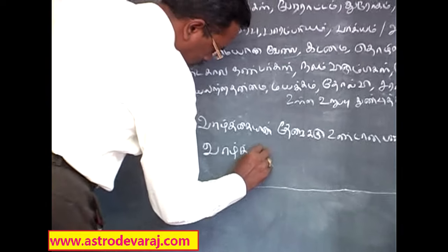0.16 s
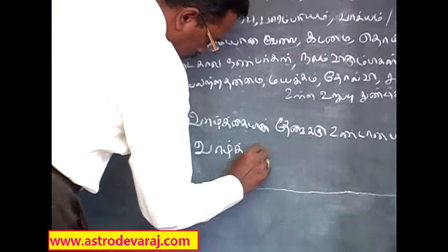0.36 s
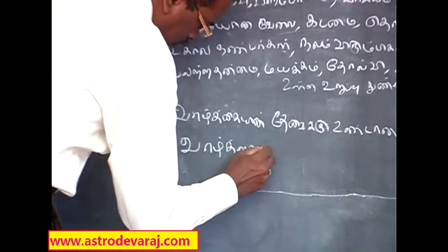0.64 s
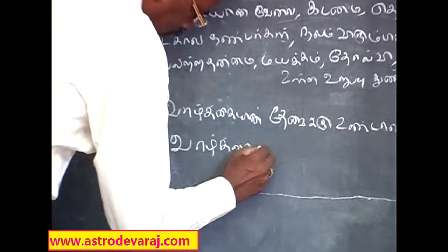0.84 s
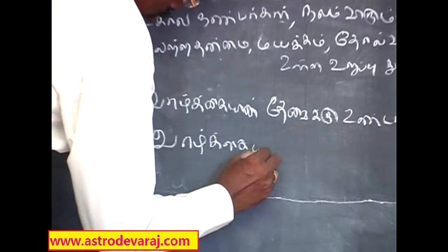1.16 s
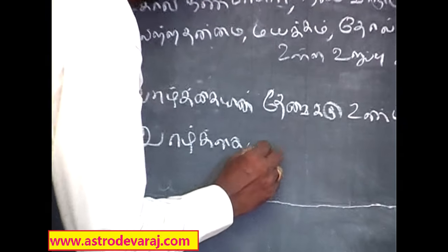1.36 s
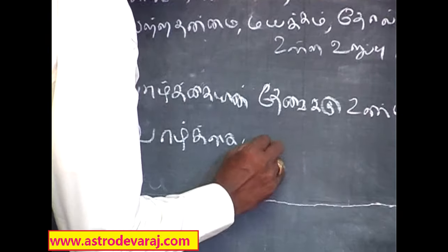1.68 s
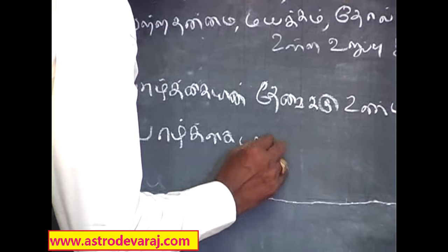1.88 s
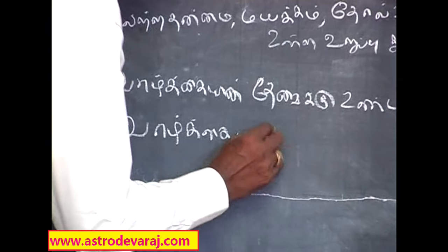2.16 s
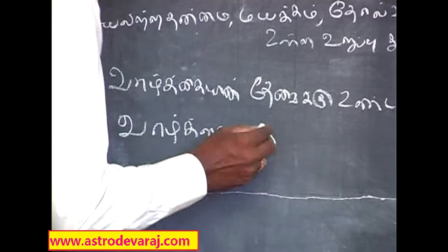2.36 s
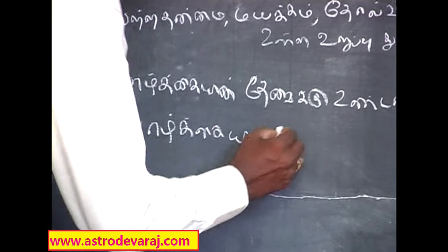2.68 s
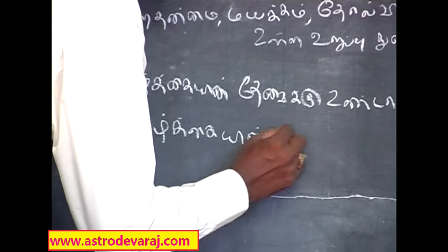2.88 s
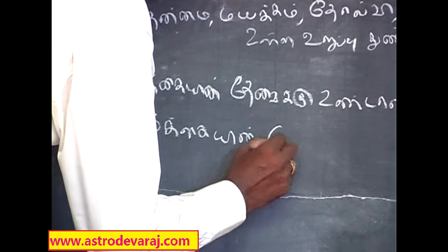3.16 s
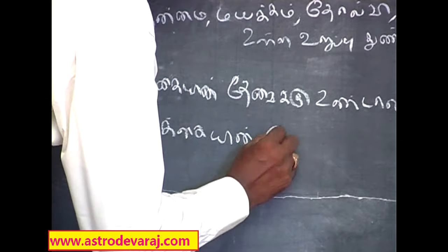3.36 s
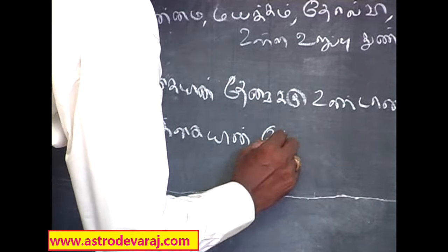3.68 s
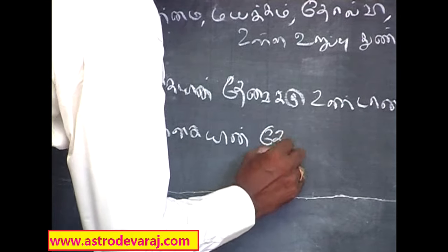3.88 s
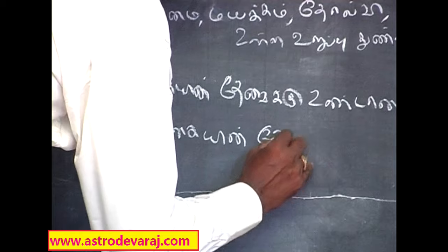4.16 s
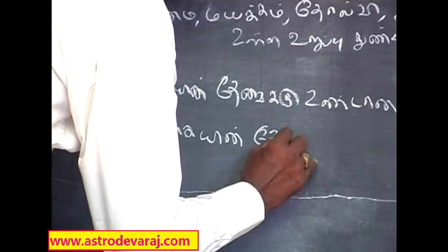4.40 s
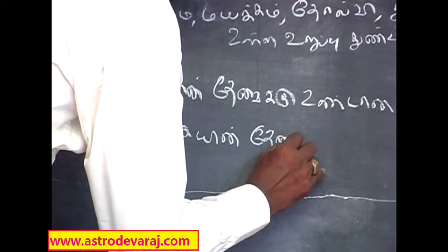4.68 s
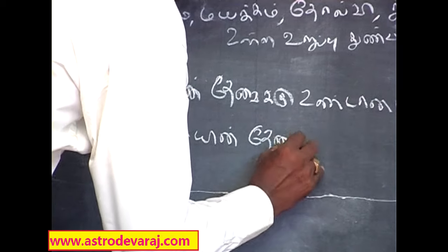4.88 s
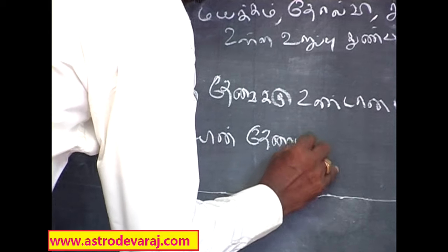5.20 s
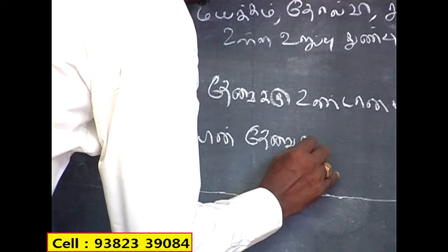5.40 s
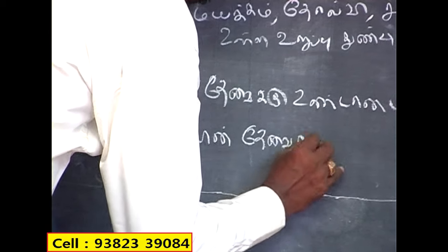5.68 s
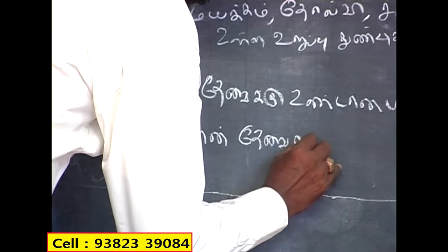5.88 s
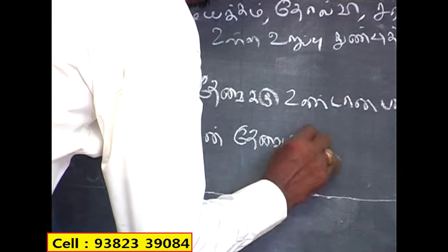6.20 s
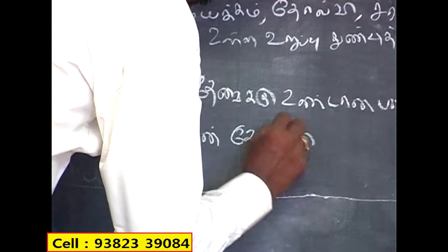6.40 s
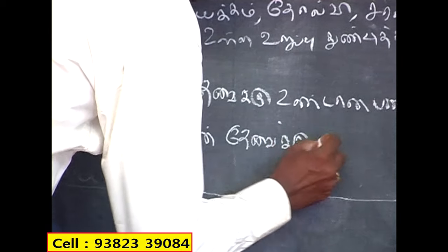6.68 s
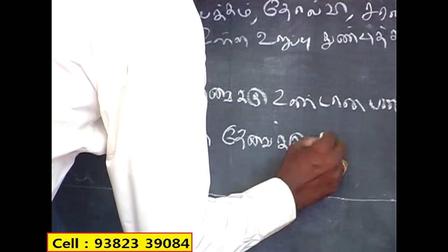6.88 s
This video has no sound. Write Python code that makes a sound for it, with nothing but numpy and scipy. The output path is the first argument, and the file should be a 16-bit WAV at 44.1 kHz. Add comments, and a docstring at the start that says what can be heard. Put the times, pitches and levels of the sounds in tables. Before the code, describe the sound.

Short, shrill chalk squeaks come in uneven runs on a nearby blackboard, mixed with dry scraping and light taps. After two brief groups of strokes, a click and a few soft knocks fill a pause of about a second. A longer run follows, finishing with a rasping squeak and a sharp tap. The classroom rings briefly after each stroke, over faint, low background noise.

```python
"""Chalk squeaking on a blackboard

Someone writes fast, close by, in a quiet classroom. The chalk taps down, then sticks and slips some
2500 times a second: each stroke is a short gliding squeak, a self-excited friction oscillation.
Crumbling chalk adds a dusty scrape, and its drag draws a soft thud from the panel. The room rings
briefly after each stroke, over low noise and a faint electrical whine."""
import sys
import numpy as np
from scipy import signal
from scipy.fft import rfft, irfft, next_fast_len
from scipy.io import wavfile
from scipy.ndimage import uniform_filter1d, minimum_filter1d

SR = 44100
rng = np.random.default_rng(int(sys.argv[2]) if len(sys.argv) > 2 else 0)


def persist_wave(psi):
    """Save psi, clipped to +-1, as 16-bit WAV."""
    counts = np.round(np.clip(psi, -1, 1) * 32767).astype(np.int16)
    wavfile.write(sys.argv[1], SR, np.atleast_2d(counts).T)


N = 310905
TIME = np.arange(N) / SR

# Chalk strokes: start t/s, rise to full grip t/s, length t/s, level/dB, fade by the end/dB,
# slip rate f/Hz on landing, at full grip and on lifting,
# relative level/dB of second harmonic, third harmonic, dust and thud
STROKES = [ (0.0, 0.0013, .024, -7.5, 12, 2532, 2548, 2642, 0.5, -9.5, 2, -8),
           (0.201, 0.011, .042, -12, 15.5, 2524, 2526, 2606, -3.5, -12.5, 2.5, 2.5),
           (0.376, 0.036, .062, -12.5, 17, 2813, 2522, 2560, 4.5, -7.5, -4, -4.5),
           (1.094, .021, .049, -14.5, 0.5, 2760, 2466, 2474, -1, -4, 0, 2.5),
           (1.294, .052, .104, -13.5, 4, 2597, 2341, 2344, -2.5, -14.5, 4, 1),
           (1.757, 0.03, .074, -13.5, -1, 2560, 2321, 2680, -1, -10.5, 0, 5),
           (1.975, 0.02, .07, -14.5, -1.5, 2557, 2318, 2763, 2, -9.5, -1, 2.5),
           (3.149, 0.02, .048, -17.5, 9, 2684, 2511, 2661, -6.5, -17, 1.5, 3.5),
           (3.378, 0.013, .029, -14, 6, 2641, 2609, 2757, -1, -15, 4, 2),
           (3.615, 0.01, 0.027, -20.5, 18.5, 2740, 2741, 2797, 1.5, -30.5, 2.5, 0),
           (3.817, 0.018, .024, -36, 10, 2654, 2635, 2635, -11, -25, -1.5, 9.5),
           (4.25, 0.029, .046, -17, 10, 2615, 2613, 2736, 0, -15.5, 1.5, 2),
           (4.469, 0.019, .037, -13.5, 12.5, 2600, 2605, 2688, 2, -15.5, 0, -0.5),
           (4.655, .006, .035, -61.5, 3.5, 2620, 2654, 2714, -20, -25, 3, -1.5),
           (4.959, 0.035, .081, -11, 9.5, 2880, 2489, 2554, 3, -7, -1.5, 0.5),
           (5.186, 0.022, .055, -14, 9, 2590, 2603, 2747, 1, -14.5, 2.5, 0.5),
           (5.376, 0.0084, 0.018, -39.5, 16.5, 2750, 2570, 2533, -1, -21.5, -8, 7.5),
           (5.409, 0.019, .036, -14, 2, 2543, 2515, 2685, 0.5, -4, 0, 1.5),
           (5.668, 0.011, .023, -23.5, 9.5, 2725, 2709, 2757, -6.5, -28, 5, 7),
           (5.829, 0.011, .038, -14.5, 4.5, 2558, 2539, 2735, 0, -10, 3, 4),
           (5.991, .008, .026, -53.5, 10, 2652, 2605, 2582, -2.5, -22, -1.5, 5.5),
           (6.175, 0.027, .103, -12.5, 0.5, 2693, 2533, 2752, 4, -6, -5, -5)]


def slip_rate(t, length, landing_hz, grip_hz, lifting_hz, glide_s=.036, free_hz=2794, flick_share=.35):
    """Load detunes a friction oscillator: pitch glides as the chalk bites and again as it lets go."""
    past_let_go = t - length + .004
    sink_hz = (landing_hz - grip_hz) * np.clip(1 - t / glide_s, 0, 1) ** 2
    climb_hz = (lifting_hz - grip_hz) * np.clip(1 + past_let_go / glide_s, 0, 1) ** 2
    glide = grip_hz + sink_hz + climb_hz
    # just before the lift, the pitch springs part of the way to that of the free chalk
    flick = flick_share * (1 + np.tanh(past_let_go / .001)) / 2
    return glide + (free_hz - glide) * flick, climb_hz


def strokes(catch_s=.0011, release_s=.0049, swell_db=28, slack_db_per_hz=.02, sway_db=2.4, sway_hz=65):
    """Self-excited vibration grows exponentially, then saturates; pressure strengthens its harmonics."""
    hz, gains = np.full(N, float(STROKES[0][5])), np.zeros((3, N))
    for start, rise, length, level_db, fade_db, *rates_hz, second_db, third_db, _, _ in STROKES:
        near = (TIME > start - .01) & (TIME < start + length + .05)
        t = TIME[near] - start
        hz[near], climb_hz = slip_rate(t, length, *rates_hz)
        biting = np.maximum(1 - t / rise, 0) ** 2
        easing = np.clip((t - rise) / max(length - rise, 1 / SR), 0, 1) ** 1.2
        pressure_db = -swell_db * biting - fade_db * easing - slack_db_per_hz * climb_hz
        catch = 1 / np.sqrt(1 + np.exp(2 - 2 * t / catch_s))
        release = np.exp(-np.maximum(t - length, 0) / release_s)
        dull_db = 9 * np.clip(t / length, 0, 1) ** 4  # the grip loosens late in the stroke
        first = catch * release * amp(level_db + pressure_db)
        second = first * amp(second_db + .16 * pressure_db)
        third = first * amp(third_db + .2 * pressure_db - dull_db)
        gains[:, near] = [first, second, third]
    sway = np.array([wander(sway_hz) for _ in gains])  # each harmonic sways as the tip travels
    drain_db = 9.5 * swells(CHATTER)  # chatter takes its energy from the plain squeak
    return hz, gains * amp(sway_db * sway - drain_db)


def coupling():
    """The coupling of friction to dust and thud holds constant through each stroke."""
    start, _, length, *_, dust_db, thud_db = np.transpose(STROKES)
    gap_middles = ((start + length)[:-1] + start[1:]) / 2
    nearest = np.searchsorted(gap_middles, TIME)
    return amp(dust_db)[nearest], amp(thud_db)[nearest]


# Upper harmonics: multiple of the slip rate, level/dB relative to the third
OVERTONES = [(4, -17.5), (5, -22.5)]
# Phase noise, as each slip lands a little differently: offset f/Hz, relative level/dB
RASP_SPECTRUM = [(30, -1.5), (120, 10), (300, -12.5), (600, -24), (1200, -33.5), (4000, -52)]


def squeak(hz, gains, jitter=.0048, glide_jitter=.007, chatter_jitter=.013, flutter_db=.53,
           rasp_db=-22, hard_grip_hz=2400):
    """Stick-slip oscillation: the board's grain modulates pitch and strength, high harmonics most."""
    climb = np.clip(np.gradient(hz) * SR / 12000, 0, 1.5)  # slips turn unsteady as the grip is lost
    shake = (jitter + glide_jitter * climb + chatter_jitter * swells(CHATTER)) * wander(400)
    phase = 2 * np.pi * np.cumsum(hz * (1 + shake)) / SR
    sharp_db = .0505 * np.maximum(hard_grip_hz - hz, 0)  # a hard grip makes slower, sharper slips
    strengths = list(gains) + [gains[2] * amp(db + sharp_db) for _, db in OVERTONES]
    tone = np.zeros(N)
    for k, strength in enumerate(strengths, 1):
        rasp = amp(rasp_db) * np.sqrt(k) * coloured(rng.standard_normal(N), RASP_SPECTRUM)
        flutter = amp(flutter_db * np.sqrt(k) * wander(130))
        tone += strength * flutter * np.sin(k * phase + rasp)
    return np.sqrt(2) * tone, phase


# Bouts of chatter: centre t/s, half length t/s, level/dB relative to the squeak
CHATTER = [(0.005, 0.013, -11), (.41, .012, -31), (1.375, 0.022, -26), (1.79, 0.0096, -25),
           (2.005, .01, -27), (5.003, 0.004, -28.5), (6.215, 0.017, -29.5), (6.243, 0.016, -7.5)]
# Spectral envelope of the chatter lines: f/Hz, relative level/dB
CHATTER_SPECTRUM = [(1300, -6), (3800, -9), (6200, 3), (7000, -6.5), (9000, -15.5), (14000, -28)]


def chatter(hz, phase, vigour):
    """Period doubling: pressed hard, strong and weak slips alternate, adding lines between harmonics."""
    lines = sum(amp(read(CHATTER_SPECTRUM, k * hz)) * np.sin(k * phase) for k in np.arange(6) + .5)
    flutter = 1 + .6 * wander(200)
    return np.sqrt(2) * vigour * swells(CHATTER) * lines * flutter


# Scrape of crumbling chalk: f/Hz, relative level/dB
DUST_SPECTRUM = [(60, -10), (150, 1), (270, 9), (400, 7), (600, 1.5), (800, 5), (1400, -0.5), (2000, -5),
                 (3400, -18), (4600, -15), (6200, -9), (8500, -19.5), (12000, -30.5), (14500, -52.5)]


def dust(vigour, gain_db=-29, clump_db=3, clump_hz=500, growth=.67):
    """Abrasion noise: chalk crumbles in tiny clumps, the more the harder it squeaks."""
    crumbs = rng.standard_normal(N) * amp(clump_db * wander(clump_hz))
    return amp(gain_db) * vigour ** growth * coloured(crumbs, DUST_SPECTRUM)


# Chalk landings: t/s, level/dB, treble gain above 4 kHz/dB, ring T60/s
TAPS = [(0.185, -46, -1, 0.099), (1.622, -56, -24, 0.088), (2.217, -25.5, 8, 0.071),
        (2.389, -56, -12, 0.08), (3.357, -41.5, -5, 0.063), (3.597, -45, 2, 0.081),
        (4.661, -55, -6.5, 0.18), (5.38, -66, -3.5, 0.051), (5.643, -36, -4, 0.082), (5.811, -33.5, 5, .08),
        (6.492, -27, 4.5, 0.083), (6.979, -51, -23, 0.058)]
# The board's dense upper modes: f/Hz, relative level/dB
TAP_SPECTRUM = [(100, -2.5), (400, -2.5), (900, 6.5), (1700, 6), (2700, 0.5), (3600, -17), (5000, -5),
                (6200, -5.5), (7500, -24.5), (10000, -35.5), (12000, -36.5), (14000, -62.5)]


def taps(crack_db=-3, crack_s=.0011, onset_s=.0005):
    """Impact excitation: each landing is a dry crack that rings in modes dense enough to act as noise."""
    out, t = np.zeros(N), np.arange(SR // 4) / SR
    onset = 1 - np.exp(-(t / onset_s) ** 2)
    highpass = signal.butter(2, 4000, "high", fs=SR, output="sos")
    for start, db, bright_db, t60 in TAPS:
        ring = coloured(rng.standard_normal(len(t)), TAP_SPECTRUM)
        ring += (amp(bright_db) - 1) * signal.sosfiltfilt(highpass, ring)
        decay = amp(-60 * t / t60) + amp(crack_db) * np.exp(-t / crack_s)
        add(out, start, amp(db) * onset * decay * ring)
    return out


# Low modes of the panel: f/Hz, relative level/dB, T60/s
PANEL_MODES = [(29.95, -5, 0.61), (47.4, -4.5, 0.31), (72, -5.5, 0.12), (90, 3.5, 0.053), (181.3, -9, 0.29),
               (241, -6, 0.15), (348, -14, 0.3)]


def panel():
    """Modal superposition: the panel's impulse response is a sum of damped sinusoids."""
    t = np.arange(SR // 2) / SR
    return sum(amp(db - 60 * t / t60) * np.sin(2 * np.pi * hz * t) for hz, db, t60 in PANEL_MODES)


def panel_thud(tone, push_db=-1, boom_db=-12, low_hz=38, high_hz=85):
    """Forced vibration: the gripping chalk's mean drag pushes the panel, a soft thud with each squeak."""
    drag = -np.pi / 2 * band(abs(tone), 860, "low", order=4)
    push = band(band(drag, low_hz, "high"), high_hz, "low", order=1)
    ring = panel()
    boom = signal.fftconvolve(push, ring / abs(rfft(ring)).max())[:N]
    return amp(push_db) * push + amp(boom_db) * boom


# Nudges of hand or chalk against the panel: t/s, level/dB
KNOCKS = [(0.722, -54), (2.217, -32), (2.388, -38.5), (2.72, -47), (2.895, -55), (2.99, -48), (3.356, -52),
          (3.601, -48.5), (3.631, -37.5), (5.641, -43.5), (5.81, -42), (6.495, -33.5), (6.977, -60)]


def knocks():
    """Free vibration: each nudge leaves the panel's low modes ringing."""
    out = np.zeros(N)
    for start, db in KNOCKS:
        add(out, start, amp(db) * panel())
    return out


# Grazing touches of the chalk: centre t/s, half length t/s, level/dB
BRUSHES = [(1.48, 0.019, -56.5), (2.65, 0.045, -69), (3.04, 0.084, -72.5), (3.85, 0.051, -63.5),
           (4.73, 0.077, -75.5)]
# Their hiss: f/Hz, relative level/dB
BRUSH_SPECTRUM = [(300, -8), (1500, 8), (2600, 11), (3500, -23), (5300, 12), (6500, 2.5), (8500, -4),
                  (13000, -33.5)]


def brushes():
    """Sliding friction: a light touch hisses without squeaking."""
    return swells(BRUSHES) * coloured(rng.standard_normal(N), BRUSH_SPECTRUM)


# Paths by way of the writer, the floor and near walls: delay t/s, pressure ratio
REFLECTIONS = [(.0031, 0.11), (.0074, 0.096), (0.009, 0.069), (0.0169, 0.14), (0.0243, -0.046),
               (0.034, 0.11)]


def echoes(direct):
    """Early reflections: each near surface returns a delayed, weaker copy of the direct sound."""
    out = np.zeros(N)
    for delay, gain in REFLECTIONS:
        add(out, delay, gain * direct)
    return out


# Radiation of the squeak into the room: f/Hz, relative level/dB
SQUEAK_SPREAD = [(100, -8), (1300, 4), (2300, 3), (2800, 3), (4700, 3), (5300, -3), (5800, -0.5),
                 (7500, -12), (10000, -7), (12500, -3.5), (14500, -19.5)]


def spread(tone):
    """Directivity: the squeak beams from the tip, so the room's share of it depends on frequency."""
    return filtered(tone, SQUEAK_SPREAD)


# Reverberation time of the classroom: f/Hz, T60/s
ROOM_DECAY = [(100, .33), (530, .31), (1400, .29), (2100, .26), (2600, .2), (3700, .26), (5200, .21),
              (7000, .24), (10000, .24)]


def classroom(x, build_s=.018):
    """Diffuse reverberation: three decaying tails crossfade as the writer moves along the board."""
    out = np.zeros(N)
    for k in range(3):
        hz, t, noise = signal.stft(rng.standard_normal(SR // 2), SR, nperseg=256)
        decay = amp(-60 * t / read(ROOM_DECAY, hz)[:, None])
        build = 1 - np.exp(-t / build_s)
        _, tail = signal.istft(noise * decay * build, SR, nperseg=256)
        share = np.sqrt(2 / 3) * np.cos(np.pi * (TIME / 2 + k / 3))
        out += signal.fftconvolve(x * share, tail / np.linalg.norm(tail))[:N]
    return out


# Room noise: f/Hz, relative level/dB
AIR_SPECTRUM = [(12, -30.5), (20, 1), (70, -11), (105, -1.5), (124, -21), (189, -3), (294, -7.5),
                (377, -2.5), (587, -15), (656, -9.5), (1460, -17.5), (2040, -23), (3270, -32.5),
                (11700, -31.5), (15000, -63)]
# Electrical whine: f/Hz, level/dB
WHINE_TONES = [(8102, -90.5), (11924, -88.5)]


def air(level_db=-61, swell_db=.1):
    """Ambient noise: a continuous spectrum, strongest in the bass, with faint lines of electrical whine."""
    noise = amp(level_db + swell_db * wander(5.6)) * coloured(rng.standard_normal(N), AIR_SPECTRUM)
    whine = sum(np.sqrt(2) * amp(db) * np.sin(2 * np.pi * hz * TIME) for hz, db in WHINE_TONES)
    return noise + whine


def amp(db):
    """Decibels to amplitude ratio."""
    return 10 ** (np.asarray(db) / 20)


def unit(x):
    """Normalisation to rms 1."""
    return x / np.sqrt(np.mean(x ** 2) + 1e-20)


def read(points, hz):
    """Interpolation on a log-frequency axis."""
    f, value = np.transpose(points)
    return np.interp(np.log(hz + 1), np.log(f + 1), value)


def add(mix, start_s, sound):
    """Superposition of a sound on the mix."""
    part = mix[max(0, round(start_s * SR)):][:len(sound)]
    part += sound[:len(part)]


def filtered(x, spectrum):
    """Zero-phase filtering by rows of f/Hz, level/dB."""
    size = next_fast_len(len(x) + 4096)
    gain = amp(read(spectrum, np.fft.rfftfreq(size, 1 / SR)))
    return irfft(rfft(x, size) * gain, size)[:len(x)]


def coloured(x, spectrum):
    """Spectral shaping, at rms 1."""
    return unit(filtered(x, spectrum))


def band(x, hz, kind, order=2):
    """Causal low- or high-pass filtering."""
    return signal.sosfilt(signal.butter(order, hz, kind, fs=SR, output="sos"), x)


def wander(hz):
    """Random drift: low-passed noise at rms 1."""
    return unit(band(rng.standard_normal(N), hz, "low"))


def swells(rows):
    """Bell-shaped envelopes from rows of centre t/s, half length t/s, level/dB."""
    return sum(amp(db) * np.exp(-((TIME - centre) / half) ** 2) for centre, half, db in rows)


def scene(squeak_wet_db=-16, dust_wet_db=-4, tap_wet_db=-8, thud_wet_db=-12,
          side_db=-24, air_side_db=-19, balance_db=-.2):
    """Direct and reverberant fields add; heard almost at one point, left and right are nearly alike."""
    hz, gains = strokes()
    vigour = np.sqrt((gains ** 2).sum(0))
    dust_gain, thud_gain = coupling()
    tone, phase = squeak(hz, gains)
    tone += chatter(hz, phase, vigour)
    scrape = dust_gain * dust(vigour) + brushes()
    thud = panel_thud(thud_gain * tone)
    impacts = taps() + knocks()
    direct = tone + scrape + thud + impacts
    # scrape and taps radiate from the whole panel and fill the room more than the squeak
    sent = (amp(squeak_wet_db) * spread(tone) + amp(dust_wet_db) * scrape
            + amp(tap_wet_db) * impacts + amp(thud_wet_db) * thud)
    mid = direct + echoes(direct) + classroom(sent) + air()
    side = amp(side_db) * classroom(sent) + amp(air_side_db) * air()
    return np.array([amp(balance_db) * (mid + side), amp(-balance_db) * (mid - side)])


def record(dry, edge_hz=15600):
    """Peak limiting holds the loudest squeaks at full scale; a low-pass then limits the bandwidth."""
    headroom = 1 / np.maximum(abs(dry).max(0), 1)
    gain = uniform_filter1d(minimum_filter1d(headroom, size=200), size=200)
    lowpass = signal.firwin(255, edge_hz, window=("kaiser", 9), fs=SR)
    return signal.oaconvolve(dry * gain, lowpass[None], "same")


dry = scene()
out = record(dry)
persist_wave(out)
```